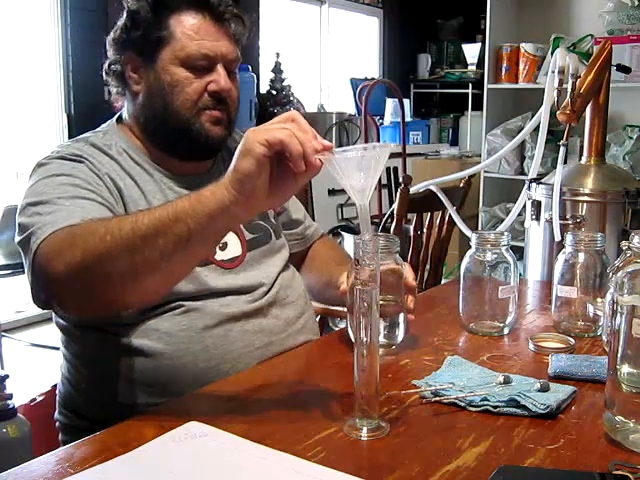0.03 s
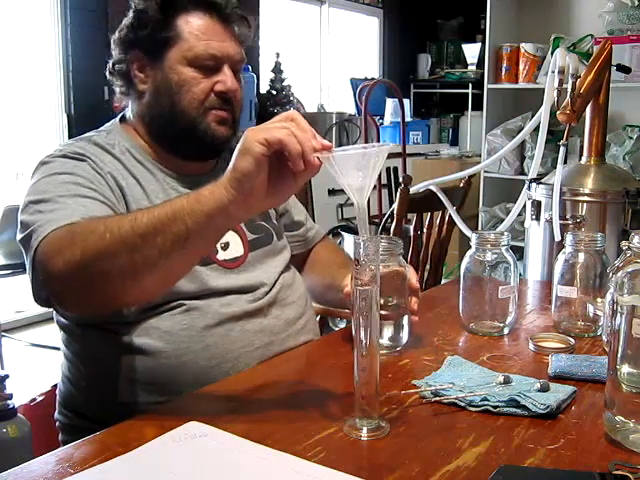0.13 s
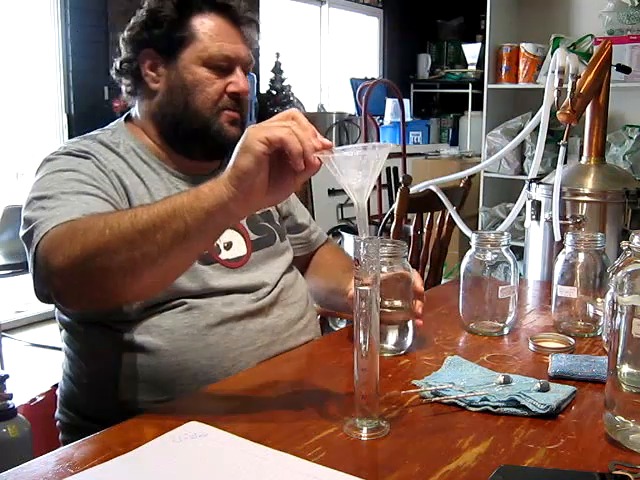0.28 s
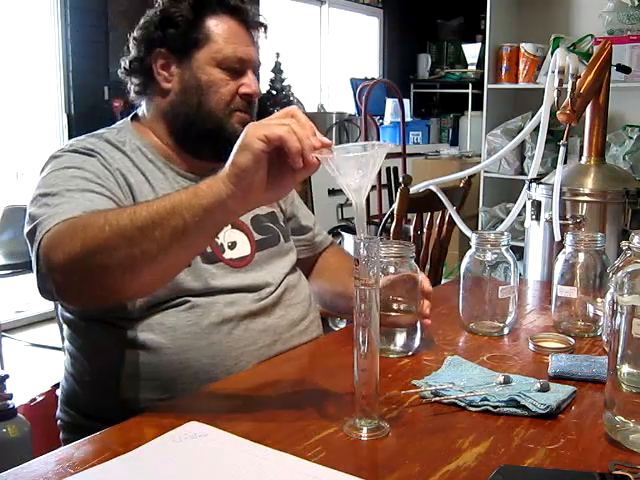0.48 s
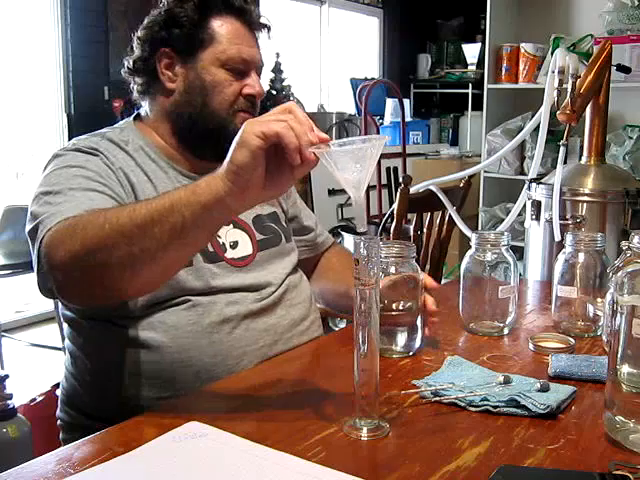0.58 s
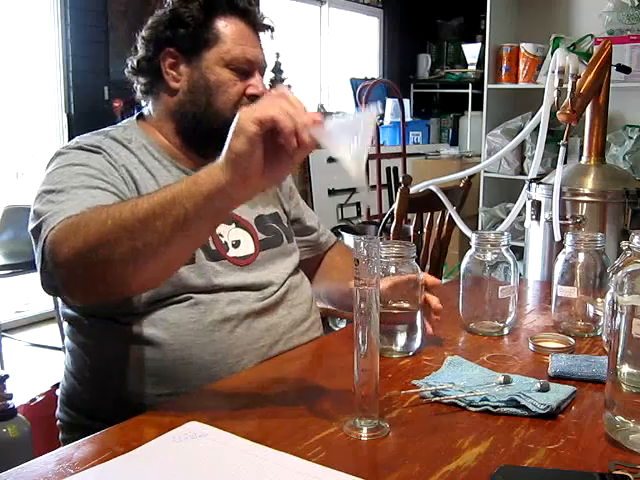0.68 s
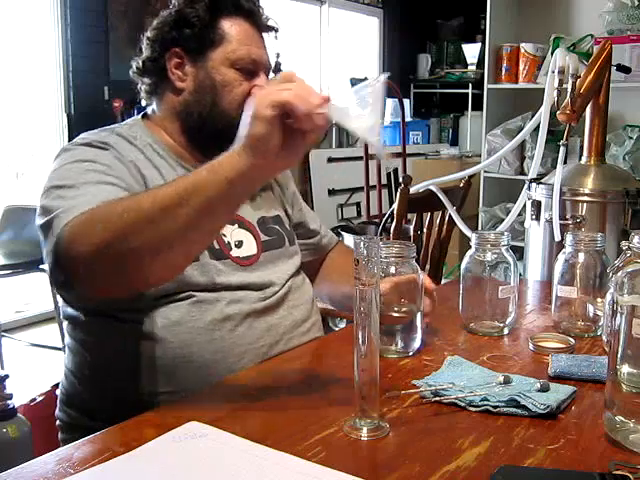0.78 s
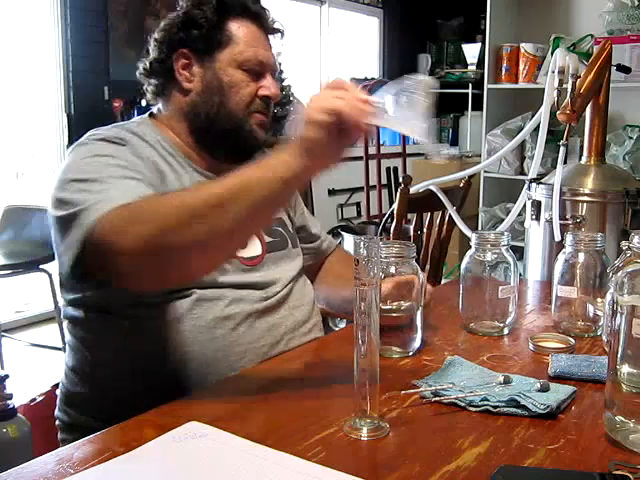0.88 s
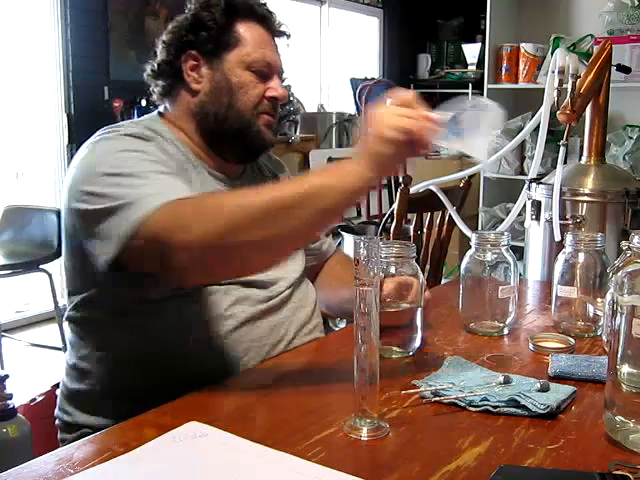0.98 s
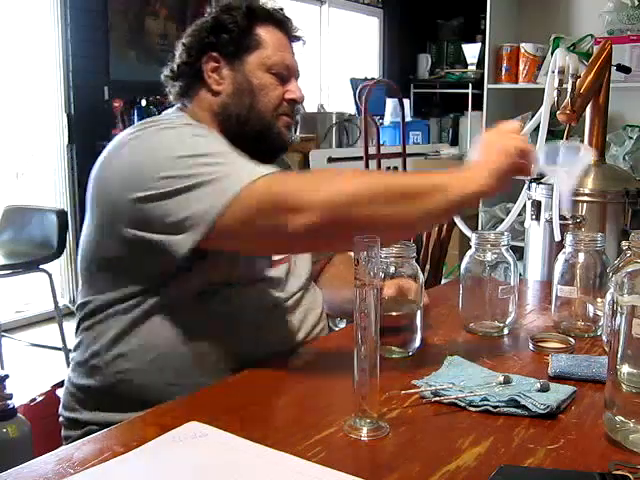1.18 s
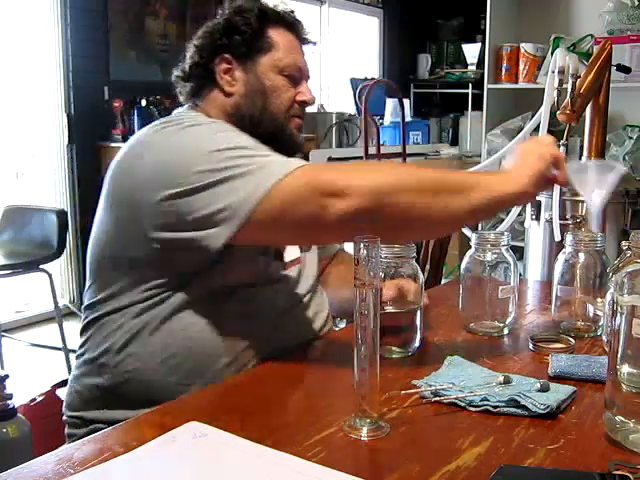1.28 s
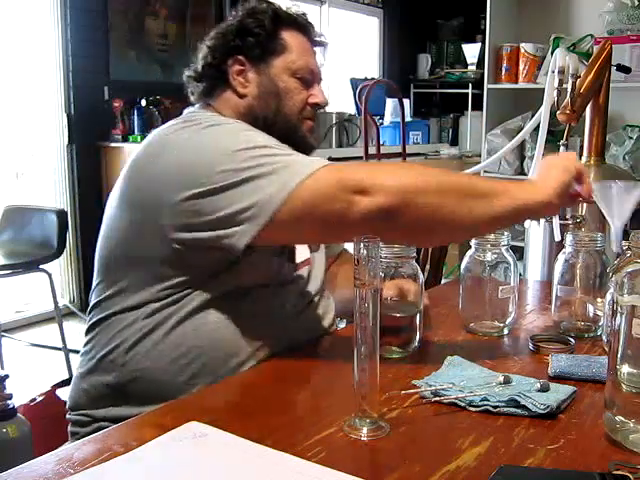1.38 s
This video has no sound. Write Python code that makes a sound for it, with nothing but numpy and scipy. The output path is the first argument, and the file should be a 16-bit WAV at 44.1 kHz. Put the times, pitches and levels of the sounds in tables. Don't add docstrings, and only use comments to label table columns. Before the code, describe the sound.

Glass jar set on wooden table with a double clunk, then a faint plastic funnel bump

```python
import sys
import numpy as np
from scipy import signal
from scipy.fft import rfft, irfft
from scipy.io import wavfile
from scipy.ndimage import map_coordinates

SR = 44100
rng = np.random.default_rng(int(sys.argv[2]) if len(sys.argv) > 2 else 0)


def log_audio(samples):
    frames = np.atleast_2d(samples).T
    limited = np.clip(frames, -1, 1)
    pcm = np.round(limited * 32767).astype(np.int16)
    wavfile.write(sys.argv[1], SR, pcm)


def level_to_linear(level):
    exponent = np.asarray(level, float) / 20
    return 10 ** exponent


N = 63945
TIME_S = np.arange(N) / SR


def along(points, hz):
    point_hz, value = np.transpose(points)
    return np.interp(np.log(hz + 1), np.log(point_hz + 1), value)


def level(rows):
    return level_to_linear(np.interp(TIME_S, *np.transpose(rows)))


def noise(response):
    spectrum = rfft(rng.standard_normal(N + 1))
    hiss = irfft(spectrum * response(np.fft.rfftfreq(N + 1, 1 / SR)))[:N]
    return hiss / hiss.std()


def coloured(points):
    return noise(lambda hz: level_to_linear(along(points, hz)))


def wobble(rate):
    knots = rng.standard_normal(int(N * rate / SR) + 4)
    return map_coordinates(knots, [np.arange(N) * rate / SR])


def ring(start_s, modes, tilt_db, scatter_db):
    hz, db, t60_s = np.transpose(modes)[..., None]
    spread_s, attack_cycles = 0.0014, 0.28
    delay_s = spread_s * np.sqrt(400 / hz)
    t = np.maximum(np.arange(SR // 3) / SR - delay_s, 0)
    db = db + tilt_db * np.log2(hz / 400) + scatter_db * rng.standard_normal(hz.shape)
    attack = 1 - np.exp(-t * hz / attack_cycles)
    waves = level_to_linear(db - 60 * t / t60_s) * np.sin(2 * np.pi * hz * t) * attack
    total = waves[::2].sum(0) - waves[1::2].sum(0)
    return np.pad(total, (int(start_s * SR), N))[:N]


def bursts(rows, rise_s):
    total = np.zeros(N)
    for start_s, db, t60_s in rows:
        after = TIME_S - start_s
        fade = level_to_linear(db - 60 * np.maximum(after, 0) / t60_s)
        total += fade * np.clip(after / rise_s, 0, 1)
    return total


# start in seconds, level in dB, click level in dB,
# table brightness in dB per octave, click brightness in dB per octave.
CONTACTS = [
    (0.2381, -19, -2, -2, 1.5),
    (.257, -30, -10, 0.5, 0),
    (.279, -33.5, -6.5, 0, 3),
    (.309, -32.5, -7.5, -3.5, -6),
    (.318, -38.5, -6.5, 1.5, -2.5),
    (0.4064, -22.5, 3, 2.5, -5),
    (.4165, -21.5, -3, -3.5, -5.5),
    (.4295, -27, -6.5, 0, -5),
    (.444, -33, -13, 0.5, -4.5),
    (.511, -42.5, -9.5, 6, 3.5),
]
# pitch in Hz, level in dB, time to fall 60 dB in seconds.
TABLE_TONES = [(85.5, -12, 0.17), (134.9, -1.5, .2), (184.1, -2.5, 0.13), (245.6, -3.5, 0.22),
               (289.4, -1.5, .08), (362.7, -2, 0.23), (397.6, -2, 0.15), (515, -7.5, .11), (589, -9, 0.11),
               (635.7, -10.5, 0.13), (702.8, -15.5, 0.13), (830, -6.5, .1), (923, -14.5, 0.11),
               (999.5, -19.5, 0.087)]
# pitch in Hz, level in dB, time to fall 60 dB in seconds.
FOOT_TONES = [(341.6, 13, 0.036), (877, 4.5, .01), (1395, 3, 0.013), (3047, -2.5, 0.0061), (629.3, 0, 0.02),
              (1800, -4, 0.0092)]


def jar():
    total = np.zeros(N)
    for start_s, db, click_db, table_tilt, click_tilt in CONTACTS:
        click = level_to_linear(click_db) * ring(start_s - 0.001, FOOT_TONES, click_tilt, 1)
        table = ring(start_s - 0.001, TABLE_TONES, table_tilt, 1.5)
        total -= level_to_linear(db) * (click + table)
    return total


# start in seconds, level in dB, time to fall 60 dB in seconds.
SHUDDERS = [
    (.24, -29.5, 0.23),
    (.408, -27, .3),
]
# frequency in Hz, level in dB.
SHUDDER_COLOUR = [(60, -29), (95, -0.5), (200, -1.5), (450, -5), (650, -1.5), (900, -12), (1500, -19.5),
                  (2500, -38.5)]


def joints():
    return bursts(SHUDDERS, rise_s=0.0034) * coloured(SHUDDER_COLOUR)


# start in seconds, level in dB, time to fall 60 dB in seconds.
RATTLES = [
    (0.241, -37, .12),
    (0.262, -36, 0.11),
    (0.407, -49, 0.036),
    (.423, -36.5, 0.2),
]
# frequency in Hz, level in dB.
RATTLE_COLOUR = [(800, -120), (1200, -4), (1800, -1), (2500, 1.5), (3300, -6.5), (3900, 1.5), (4500, -5.5),
                 (5500, -4.5)]


def glassware():
    unevenness = level_to_linear(3 * wobble(300))
    return bursts(RATTLES, rise_s=0.004) * unevenness * coloured(RATTLE_COLOUR)


# start in seconds, level in dB.
BUMPS = [
    (.7645, -41),
    (.777, -48),
    (.7925, -45),
    (.822, -52),
]
# pitch in Hz, level in dB, time to fall 60 dB in seconds.
FUNNEL_TONES = [(468, -3, 0.084), (531, 3, 0.079), (657, -1, 0.062), (780.5, -3.5, 0.14), (844, -3, .1),
                (1134, -2, 0.029), (1305, -11, 0.052), (1606, -11.5, .04), (2860, -25, 0.051),
                (642, -12.5, 0.08), (948, -4, 0.046)]
# frequency in Hz, level in dB.
SCUFF_COLOUR = [(250, -38), (450, -7), (800, -0.5), (1100, -10), (1500, -17), (3000, -19), (4000, -42)]


def funnel_bump():
    bumps = sum(level_to_linear(db) * ring(start_s, FUNNEL_TONES, 0, 2) for start_s, db in BUMPS)
    after = np.maximum(TIME_S - BUMPS[0][0], 0)
    scuff_db, scuff_t60_s, rise_s = -39, 0.36, 0.0038
    fade = level_to_linear(scuff_db - 60 * after / scuff_t60_s) * np.minimum(after / rise_s, 1)
    return bumps + fade * coloured(SCUFF_COLOUR)


# time in seconds, level in dB.
BRUSH = [
    (.68, -75),
    (.78, -64),
    (.86, -64),
    (.895, -54),
    (.935, -55),
    (.95, -65),
    (.975, -58),
    (1.0, -80),
]
# pitch in Hz, width in Hz, level in dB.
RIM = [(1710, 90, -3.5), (2122, 88, -5), (2764, 180, -9.5), (1290, 77, -13)]


def funnel_brush():
    rub = noise(lambda hz: sum(level_to_linear(db) * hz * width / np.hypot(centre * centre - hz * hz, hz * width)
                               for centre, width, db in RIM))
    sing_hz, sing_db = 1722, 1.5
    sing = level_to_linear(sing_db + 1.3 * wobble(73)) * np.sin(2 * np.pi * sing_hz * TIME_S + 0.5 * wobble(56))
    return level(BRUSH) * (rub + sing)


# time in seconds, level in dB.
SLEEVE = [
    (.95, -61.5),
    (1.15, -58),
    (1.3, -56),
    (1.45, -54),
]
# frequency in Hz, level in dB.
CLOTH_COLOUR = [(600, -18), (1500, -14.5), (3000, 2), (5500, 3.5)]


def sleeve():
    return level(SLEEVE) * coloured(CLOTH_COLOUR)


# frequency in Hz, time to fall 60 dB in seconds.
ROOM_FADE = [(100, 0.26), (400, .42), (800, .33), (2000, 0.4), (5000, 0.1)]


def room(sound):
    hz, t, grains = signal.stft(rng.standard_normal(SR // 2), SR, nperseg=256)
    fade = level_to_linear(-60 * t / along(ROOM_FADE, hz)[:, None])
    tail = signal.istft(grains * fade, SR, nperseg=256)[1]
    late = np.pad(sound, (300, 0))
    return signal.fftconvolve(late, tail / np.linalg.norm(tail))[:N]


# time in seconds, level in dB.
HUSH = [(0, -47), (.06, -50), (.3, -44.5), (.7, -47), (1.05, -48), (1.45, -46.5)]
# frequency in Hz, level in dB.
AIR_COLOUR = [(25, 5), (60, -2), (130, -7.5), (400, -9.5), (900, -11.5), (2000, -14.5), (3200, -15),
              (5500, -22.5)]


def air():
    return level(HUSH) * level_to_linear(0.21 * wobble(37)) * coloured(AIR_COLOUR)


WHINE_HZ = [3043.9, 3024]
WHINE_DB = [-57, -66]


def whine():
    total = np.zeros(N)
    for hz, db in zip(WHINE_HZ, WHINE_DB):
        loudness = level_to_linear(db + 3 + wobble(25))
        total += loudness * np.sin(2 * np.pi * hz * TIME_S + 0.2 * wobble(15))
    return total


def scene():
    near = jar() + glassware() + funnel_bump() + funnel_brush()
    echo = level_to_linear(-8) * room(near)
    return (near + echo + joints() + sleeve() + air() + whine())[None]


def roll_off(x):
    return signal.sosfilt(signal.butter(12, 10200, fs=SR, output="sos"), x)


# frequency in Hz, level in dB.
SMOOTHING = [(1200, -.4), (3000, -2.1), (4000, -4.4), (5000, -8.5), (6000, -15.7), (8000, -35), (9000, -47),
             (10500, -66)]


def record(dry):
    rate_hz, step, step_offset = 11024, 1 / 128, 0.05
    bass_hz, bass_damping = 80, 1.3
    hz = np.arange(SR + 1) / 2
    bass_cut = hz ** 2 / (hz ** 2 - bass_hz ** 2 - 1j * bass_damping * hz * bass_hz)
    shift = np.exp(2j * np.pi * hz * 0.664 / rate_hz)
    spectrum = rfft(dry[0], 2 * SR) * bass_cut * shift
    slow = irfft(spectrum[:rate_hz + 1]) * rate_hz / SR
    steps = np.fft.fft(np.round(slow / step + step_offset) * step)
    mirrored = steps[np.arange(SR + 1) % (2 * rate_hz)]
    back = mirrored / shift * level_to_linear(along(SMOOTHING, hz)) * (hz < rate_hz - 500)
    finished = irfft(back)[None, :N] * SR / rate_hz
    return roll_off(finished)


dry = scene()
out = record(dry)
log_audio(out)
```